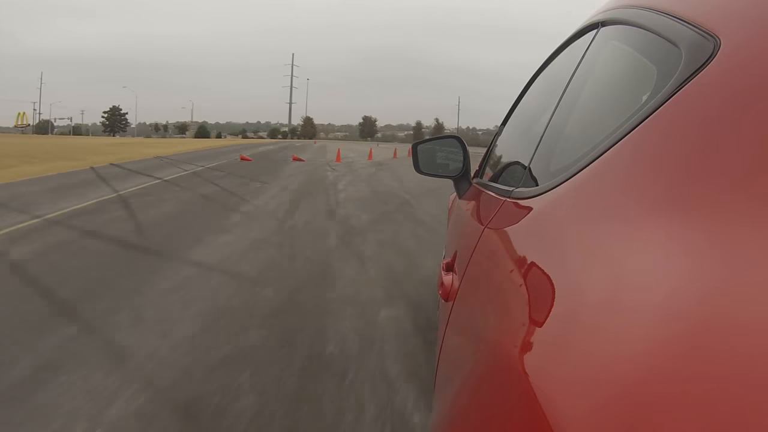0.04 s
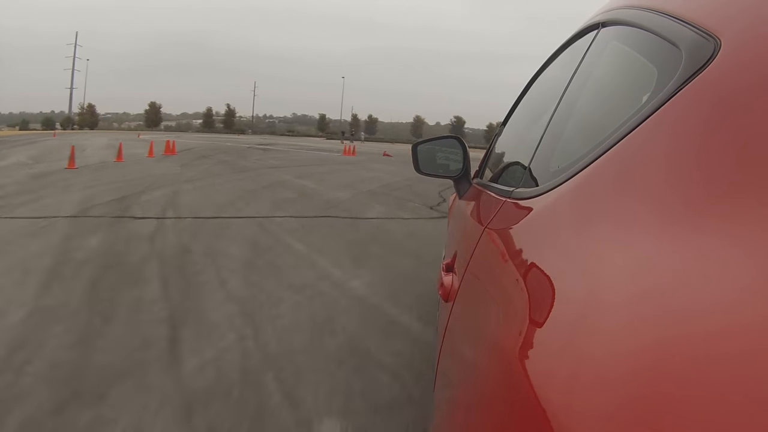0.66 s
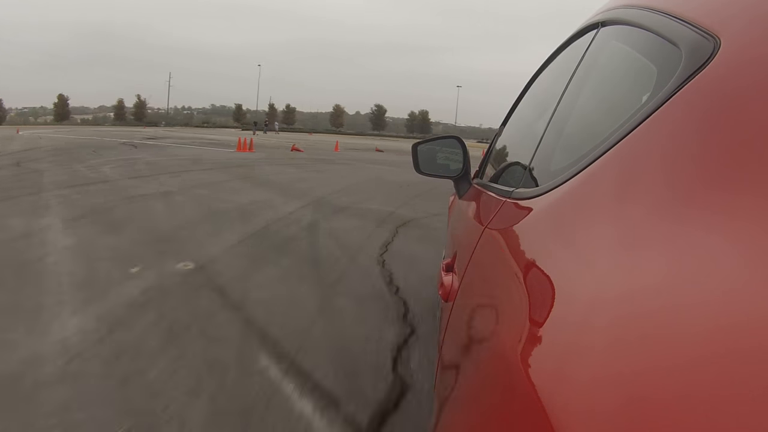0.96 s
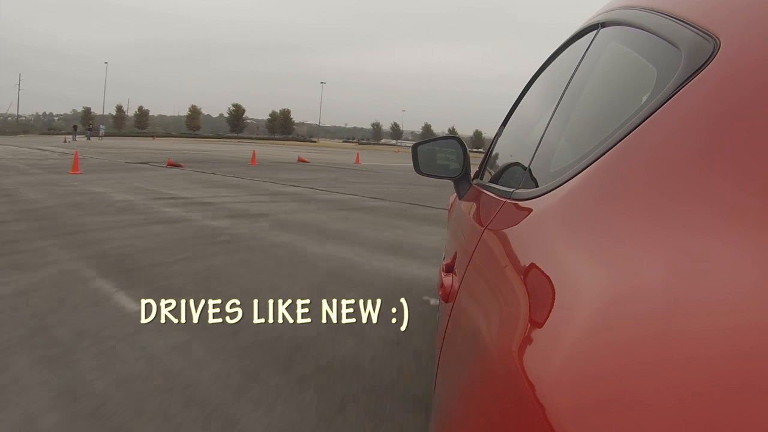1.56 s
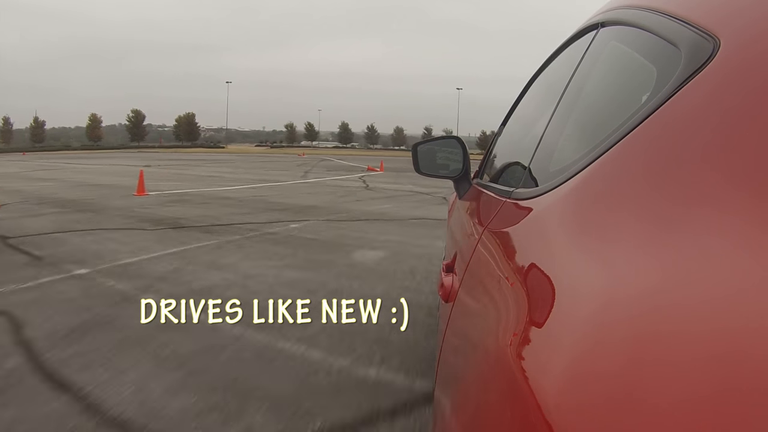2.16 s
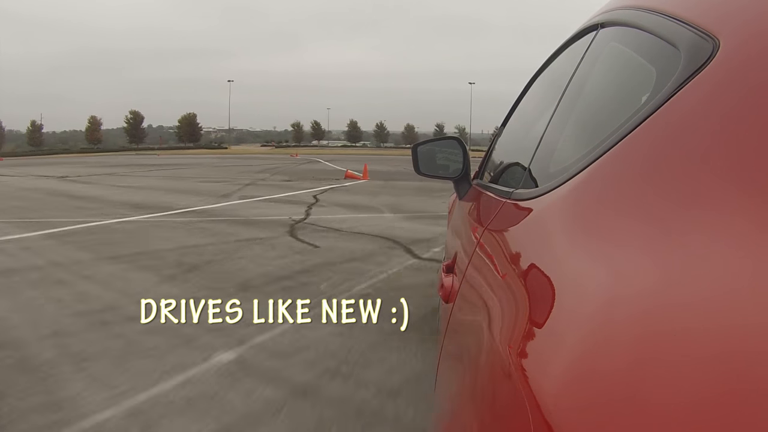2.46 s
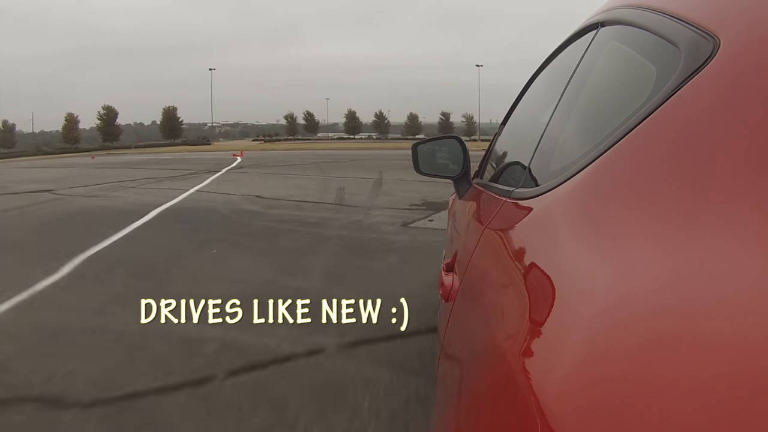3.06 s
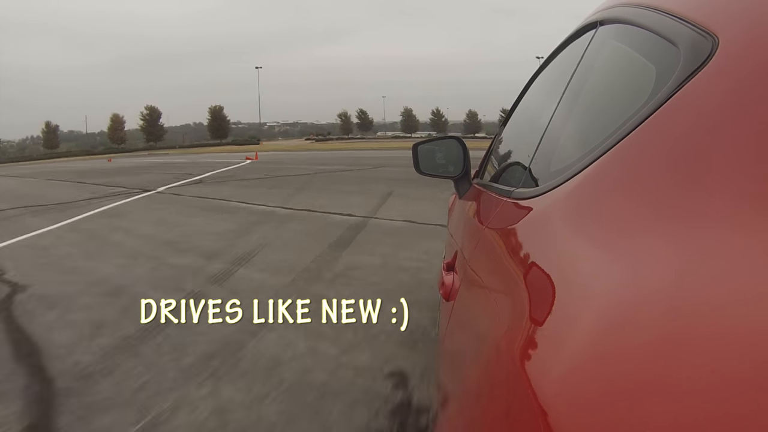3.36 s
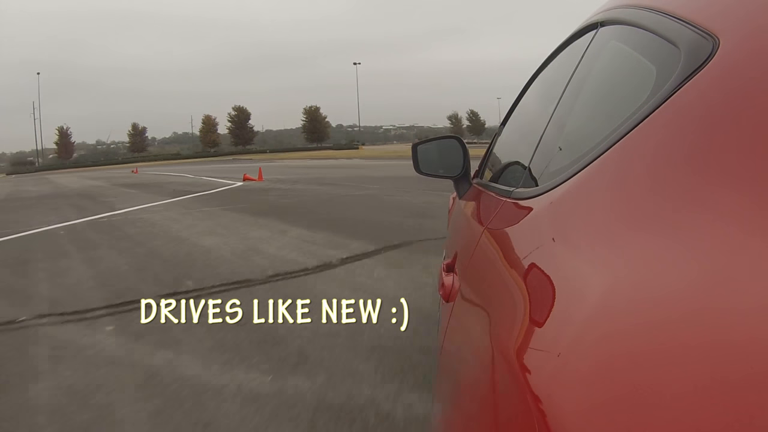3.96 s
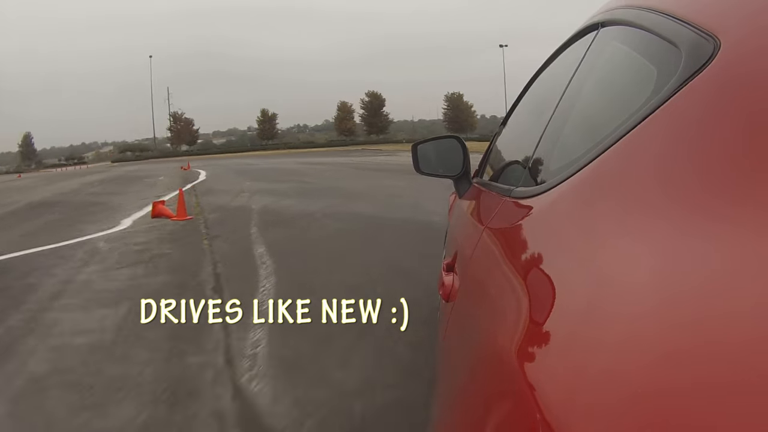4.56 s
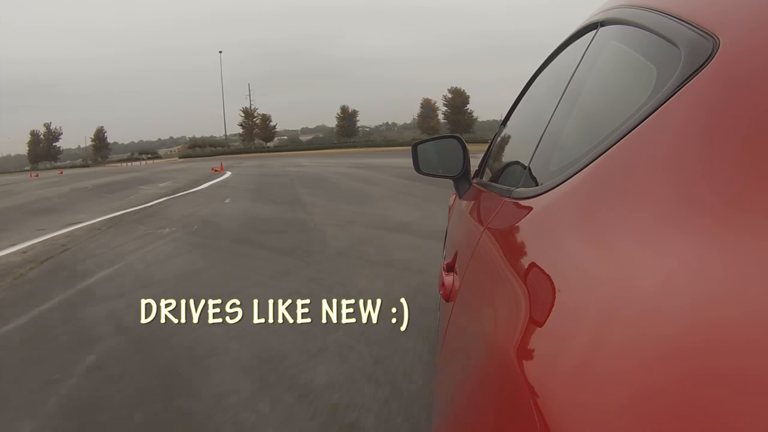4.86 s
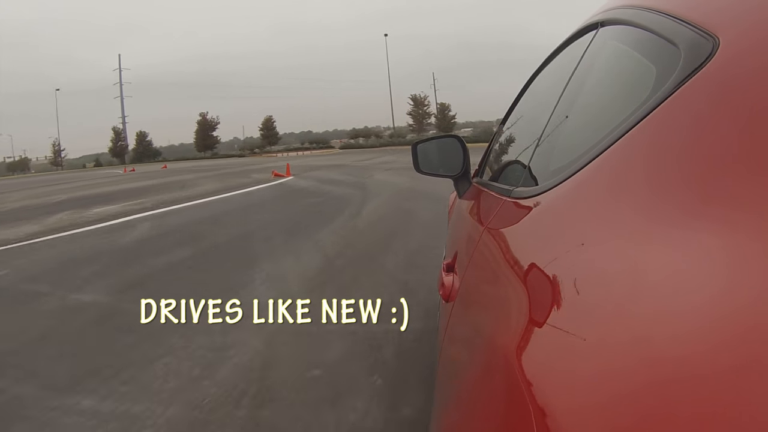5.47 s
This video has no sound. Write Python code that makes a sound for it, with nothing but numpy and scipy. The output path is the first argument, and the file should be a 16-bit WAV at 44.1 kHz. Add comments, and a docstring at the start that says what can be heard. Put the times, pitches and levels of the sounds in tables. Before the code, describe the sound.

Gusting wind and road noise surround a hard-driven car whose tyres squeal through two corners, knocking over seams in between.

```python
"""A car is driven hard round cones on a car park, heard from a microphone on its side.
From the start, gusts of wind thump the microphone over the roar and hiss of the road and a low drone.
For two seconds the tyres chirp and squeal through a corner: rough as they scrub, purer as they bite.
Then the squeal stops, and the tyres knock over seams in the asphalt and scuff briefly.
From about 4.4 s they squeal through a last corner, settling into a clear note near 5.2 s."""
import sys
import numpy as np
from scipy import signal
from scipy.fft import rfft, irfft, next_fast_len
from scipy.io import wavfile
from scipy.ndimage import uniform_filter1d, minimum_filter1d

SR = 44100
rng = np.random.default_rng(int(sys.argv[2]) if len(sys.argv) > 2 else 0)


def master(y):
    """Save y as 16-bit WAV."""
    cut = np.clip(np.atleast_2d(y).T, -1, 1)
    pcm = np.round(cut * 32767)  # scale
    wavfile.write(sys.argv[1], SR, pcm.astype(np.int16))


N = 247842
TIME = np.arange(N) / SR


def gain_of(db):
    """Turns decibels into a number to multiply a sound by."""
    return 10 ** (np.asarray(db) / 20)


def evened(x):
    """Scales a signal so that its average power is one."""
    return x / np.sqrt(np.mean(abs(x) ** 2) + 1e-20)


def curves(rows):
    """Joins the dots of a table: one curve for each column after the time."""
    s, *columns = np.transpose(rows)
    return [np.interp(TIME, s, column) for column in columns]


def hump(s, length):
    """A rounded rise to one and back, centred on time s."""
    return np.exp(-np.minimum(abs(2 * (TIME - s) / length), 4) ** 3)


def noise(shape):
    """Noise in which shape(f) says how strong each frequency is."""
    size = next_fast_len(N)
    spectrum = rfft(rng.standard_normal(size)) * shape(np.fft.rfftfreq(size, 1 / SR))
    return evened(irfft(spectrum, size)[:N])


def coloured(points):
    """Noise whose tone colour follows a table of frequencies and levels."""
    hz, db = np.transpose(points)
    return noise(lambda f: gain_of(np.interp(np.log(f + 1), np.log(hz), db)))


def band(hz):
    """Noise a little over an octave wide around hz."""
    return noise(lambda f: (f / hz) ** 3 / (1 + (f / hz) ** 9))


def wander(rate):
    """A smooth random wobble, up to about rate times a second."""
    return noise(lambda f: 1 / (1 + (f / rate) ** 4))


def steadied(x, span, amount):
    """Partly flattens the chance swells in a noise that last longer than span seconds."""
    window = signal.windows.hann(int(span * SR) + 3)
    power = signal.fftconvolve(abs(x) ** 2, window / window.sum(), "same")
    return evened(x / (power + 1e-3) ** (amount / 2))


def fuzz(width):
    """Random swings of strength and timing that blur a tone by about width Hz each way."""
    return steadied(wander(width) + 1j * wander(width), span=0.073, amount=0.34)


def tone(cycles, rough, width):
    """One tone from a running count of cycles: pure at rough=0, a band of noise at rough=1."""
    rough = np.clip(rough, 0, 1)
    strength = np.sqrt(1 - rough) + np.sqrt(rough) * fuzz(width)
    return np.sqrt(2) * (strength * np.exp(2j * np.pi * cycles)).real


# how the car's drone swells and fades: t/s, level/dB
DRONE_LEVELS = [(0, -31), (.85, -16), (1.1, -18.5), (1.3, -29), (2.2, -22.5), (2.5, -27), (3.2, -13.5),
                (3.7, -68), (5.62, -27)]
def drone():
    """The car under load hums a low, wavering note."""
    db, = curves(DRONE_LEVELS)
    hz = 61 * (1 + 0.0583 * wander(2.8))
    return gain_of(db - 4) * tone(np.cumsum(hz) / SR, rough=0.96, width=5.9)


# swells of rumble: t/s, length/s, level/dB, f/Hz
RUMBLES = [(0.199, 0.019, -14.5, 430), (0.913, 0.13, -24.5, 530), (1.666, 0.089, -25, 601),
           (1.933, 0.058, -16.5, 244), (2.352, 0.054, -18.5, 300), (4.056, 0.08, -16, 236),
           (4.433, 0.092, -18.5, 248), (4.699, 0.056, -18.5, 389.6), (4.899, 0.71, -23, 213)]
def rumbles():
    """Rough air and rough asphalt bring short swells of low noise."""
    return sum(gain_of(db) * hump(s, length) * steadied(band(hz), span=0.04, amount=0.38)
               for s, length, db, hz in RUMBLES)


def pops(per_second=13, widths_s=(0.00089, 0.0014)):
    """Small swirls of air burst on the microphone, each one a push with its rebound."""
    out = np.zeros(N)
    for width_s in widths_s:
        u = np.arange(-SR // 50, SR // 50) / SR / width_s
        push = (1 - u ** 2) * np.exp(-u ** 2 / 2)
        hits = rng.random(N) < per_second / len(widths_s) / SR
        bursts = hits * rng.choice([-1, 1], N) * rng.uniform(0.78, 1, N)
        out += signal.oaconvolve(bursts, push, "same")
    return out


# slow changes in the air and road noise: t/s, wind/dB, roar/dB, hiss/dB
AIR_LEVELS = [(0, -17, -17, -55), (.7, -23, -18, -54.5), (1.5, -23.5, -17, -53.5), (2.2, -21.5, -18, -55.5),
              (2.6, -22, -18.5, -56), (2.95, -20.5, -16.5, -53), (3.1, -18.5, -19, -56),
              (4.05, -20, -17, -54.5), (4.4, -17, -16.5, -56), (4.8, -18.5, -19.5, -56),
              (5.45, -17, -22.5, -62), (5.62, -20.5, -20.5, -57.5)]
# gusts, timed at the thump: t/s, length of each stage/s, surge/dB, thump/dB, duck/dB
WIND_GUSTS = [(1.11, 0.05, 1, 8, -0.5), (2.11, 0.039, 3, 1, 3), (2.43, 0.062, 0, 5.5, 5.5),
              (3.326, 0.031, 4.5, 5.5, 4), (3.518, 0.037, 2, 1.5, 5.5), (3.82, 0.079, 1.5, 4.5, 1),
              (4.484, 0.037, 3.5, -7, 0), (4.86, 0.04, 3.5, 4, 5)]
def airflow():
    """Three levels: a gust surges and thumps the microphone, then roar and hiss duck briefly."""
    wind_db, roar_db, hiss_db = curves(AIR_LEVELS)
    thumps = sum(thump_db * hump(s, length) for s, length, _, thump_db, _ in WIND_GUSTS)
    swing = sum(surge_db * hump(s - length, length) - duck_db * hump(s + length, length)
                for s, length, surge_db, _, duck_db in WIND_GUSTS)
    return wind_db + thumps, roar_db + swing, hiss_db + 0.93 * swing


# tone colours of the wind on the microphone, the road's roar and its hiss: f/Hz, level/dB
WIND_COLOUR = [(12, -18), (24, -8), (38, 3), (55, 1), (80, -2.5), (120, -7.5), (250, -39.5), (600, -95)]
ROAR_COLOUR = [(40, -18.5), (90, -1), (140, 1.5), (250, -2.5), (400, -5), (600, -10), (800, -16.5),
               (1100, -25.5), (1600, -29), (2600, -39), (3600, -41), (7000, -94)]
HISS_COLOUR = [(500, 8), (1500, 0), (2800, 7.5), (3500, -3), (4500, 3), (5500, -4), (6800, -9),
               (8500, -9.5), (10000, -11.5), (11200, -17.5), (12500, -27.5), (15000, -32.5)]
def wind_and_road():
    """Swirling air thumps the microphone and shakes the roar and the hiss together."""
    wind_db, roar_db, hiss_db = airflow()
    swirls, flicker = wander(29), wander(130)
    wind = gain_of(wind_db + 1) * steadied(coloured(WIND_COLOUR), span=0.13, amount=0.55)
    shaken_roar = coloured(ROAR_COLOUR) * gain_of(0.96 * swirls + 1.46 * flicker)
    roar = gain_of(roar_db - 0.45) * steadied(shaken_roar, span=0.19, amount=0.75)
    hiss = gain_of(hiss_db + 13) * evened(coloured(HISS_COLOUR) * gain_of(1.1 * swirls + flicker))
    return wind + roar + hiss + gain_of(roar_db + 9) * pops()


# hits from grit and seams: t/s, level/dB, fade time/s, f/Hz
KNOCKS = [(0.456, -45, 0.0036, 9500), (2.585, -4.5, 0.0041, 453), (3.301, -9, 0.0048, 402),
          (3.323, -28, 0.0042, 1620), (3.436, -18, 0.0048, 1720), (3.443, -7, 0.0065, 325),
          (3.488, -1.5, 0.0066, 308), (4.03, -16, 0.0078, 560), (4.692, -10, 0.0043, 500)]
def knock(s, db, decay, hz):
    """Flung grit ticks on the car, or a seam knocks a tyre: noise that dies at once."""
    age = np.maximum(TIME - s, 0)
    rise = np.minimum(age * hz / 2, 1)  # two cycles long
    return gain_of(db) * rise * np.exp(-age / decay) * steadied(band(hz), span=0.025, amount=0.68)


# tone colour of dragged rubber: f/Hz, level/dB
SCRUB_COLOUR = [(400, -37), (780, 9), (1200, 7.5), (1550, -1.5), (2200, -3.5), (2900, -9), (3600, -15.5),
                (4500, -15), (7000, -33), (12000, -70)]
def scrub():
    """The even noise of rubber dragging over asphalt."""
    return coloured(SCRUB_COLOUR)


# brief sideways drags: t/s, length/s, level/dB
TYRE_SCUFFS = [(0.197, 0.059, -29), (3.277, 0.076, -31), (3.5, 0.045, -35)]
def scuffs():
    """A tyre is dragged sideways for a moment without finding a note."""
    return scrub() * sum(gain_of(db) * hump(s, length) for s, length, db in TYRE_SCUFFS)


# short slips: t/s, f/Hz, level/dB, length/s, overtone/times the pitch, overtone/dB against the note
TYRE_CHIRPS = [(.585, 1100, -18.5, 0.021, 1.7, -17), (0.714, 1124, -16, 0.028, 2.1, -26),
               (0.811, 1090, -15, 0.039, 1.96, -15), (0.885, 1033, -16.5, 0.018, 1.85, -24),
               (0.962, 1073, -21, 0.041, 1.97, -3), (1.171, 1280, -22, 0.031, 1.9, -15),
               (1.887, 1280, -25.5, 0.07, 1.92, -15), (2.06, 1450, -26, 0.031, 1.7, -18),
               (3.304, 1016, -26.5, 0.014, 2.43, -10), (5.042, 1495, -28, 0.049, 1.57, -7),
               (5.045, 1265, -25, 0.034, 1.57, -15), (5.407, 1330, -26.5, 0.05, 1.7, -14)]
def chirps():
    """A bump takes weight off a tyre, and its tread yelps and scrapes for a moment."""
    note_blur, overtone_blur = steadied(fuzz(95), span=0.03, amount=0.83), fuzz(230)
    scrape = gain_of(-11.5) * scrub()
    out = np.zeros(N)
    for s, hz, db, length, ratio, overtone_db in TYRE_CHIRPS:
        near = abs(TIME - s) < 2 * length
        t = TIME[near] - s
        note = note_blur[near] * np.exp(2j * np.pi * hz * t)
        overtone = gain_of(overtone_db) * overtone_blur[near] * np.exp(2j * np.pi * hz * ratio * t)
        yelp = np.sqrt(2) * (note + overtone).real
        out[near] += gain_of(db) * np.exp(-(2 * t / length) ** 2) * (yelp + scrape[near])
    return out


def stick_slip(hz, jitter, rate):
    """Counts the cycles of rubber gripping and letting go, their pace shaken by grainy asphalt."""
    return np.cumsum(hz * (1 + jitter * wander(rate))) / SR


# short tyre cries: t/s, length/s, f/Hz, glide/Hz per s, level/dB, octave/dB, smear/0-1
TYRE_CRIES = [(0.07, 0.16, 830, -200, -28.5, -41, 0.2), (0.199, 0.12, 898, 600, -30, -40.5, 0.5),
              (.2, 0.13, 1138, 298, -35, -52, 0.3), (0.319, 0.079, 952, 203, -28.5, -33.5, 0.2),
              (0.451, 0.15, 902, -600, -23, -30.5, 0.2), (0.731, 0.41, 1041, 2, -37, -32.5, 0.25),
              (0.929, 0.071, 892, -300, -20, -28, 0.2), (1.108, 0.24, 933, 95, -31.5, -36, 0),
              (1.185, 0.11, 1137, 0, -24, -40, 0.7), (1.25, 0.079, 1065, 600, -22.5, -30.5, 0.08),
              (1.374, 0.059, 1171, -1100, -15, -32.5, 0.02), (1.59, 0.089, 1205, -350, -30, -42, 0),
              (1.665, 0.24, 764, 6, -26.5, -43, 0.5), (1.695, 0.15, 1038, 0, -37, -41, 0),
              (1.905, 0.08, 1194, -600, -37, -40, 0), (2.005, 0.047, 1215, 300, -30, -42, 0.1),
              (2.118, 0.11, 1406, -400, -34, -54, 0.94), (4.358, .13, 953, 1201, -33.5, -45, 0.6),
              (4.6, 0.18, 931, 0, -38, -39.5, 0.6), (4.732, .15, 1128, 0, -33, -41, 0.8),
              (4.824, 0.05, 967, 513, -47, -33.5, 0.07), (4.995, 0.06, 1111, 704, -23.5, -37.5, 0),
              (5.01, .2, 966, 2, -40, -36, 0), (5.163, 0.14, 1098, 698, -28, -34, 0),
              (5.24, 0.06, 1160, -500, -38, -30, 0.07), (5.6, 0.29, 906, 98, -30, -33, 0.16)]
def cries(rough=0.45):
    """Short tyre cries with their octaves, wavering or smeared, on and around the main squeal."""
    clear = np.sqrt(1 - rough) + np.sqrt(rough) * fuzz(37)
    smeared = steadied(fuzz(150), span=0.036, amount=0.91)
    gritty = steadied(fuzz(300), span=0.032, amount=0.79)
    rasp = fuzz(220)
    chatter = evened(gain_of(3 * wander(30)))  # the overtones come and go raggedly
    drift_s = stick_slip(0.98, jitter=0.01423, rate=60) - TIME  # wavers about 2% under the listed pitch
    out = np.zeros(N)
    for s, length, hz, glide, db, octave_db, smear in TYRE_CRIES:
        near = abs(TIME - s) < length
        t = TIME[near] - s
        wave = np.exp(2j * np.pi * (hz * (t + drift_s[near]) + glide * t ** 2 / 2))
        howl = np.sqrt(1 - smear) * clear[near] + np.sqrt(smear) * smeared[near]
        # the octave smears twice as readily
        octave = (1 - smear) * clear[near] + np.sqrt(1 - (1 - smear) ** 2) * gritty[near]
        third_db = octave_db - 8 - 35.5 * abs(np.log2(hz / 900))  # strongest for cries near 900 Hz
        overtones = gain_of(octave_db) * octave * wave ** 2 + gain_of(third_db) * rasp[near] * wave ** 3
        cry = gain_of(db) * howl * wave + chatter[near] * overtones
        out[near] += np.sqrt(2) * hump(s, length)[near] * cry.real
    return out * evened(gain_of(1.55 * wander(33)))


# the sliding tread bites into a louder, purer note: t/s, length/s, rise/dB
TREAD_BITES = [(0.312, 0.091, 8), (0.437, 0.077, 6), (0.764, 0.052, 6), (1.27, 0.036, 12),
               (1.308, 0.027, 10), (1.338, 0.02, 9), (1.502, 0.075, 7), (1.686, 0.036, 6.5),
               (1.757, 0.026, 6), (1.886, 0.056, 7), (4.741, 0.043, 2.5), (4.963, 0.054, 3),
               (5.052, 0.052, 8.5), (5.117, 0.06, 6.5), (5.324, 0.039, 3.5), (5.492, 0.084, 3.5),
               (5.58, 0.12, 3.5)]
# the tread grips again and the howl dips: t/s, length/s
TREAD_GRIPS = [(0.395, 0.044), (0.555, 0.026), (0.63, 0.088), (0.79, 0.018), (.855, 0.041), (0.99, 0.024),
               (1.428, 0.014), (1.827, 0.044), (1.965, 0.022)]
def slide(slide_db):
    """Howl level, octave level and roughness: harder sliding is brighter, a bite louder and purer."""
    bite_db = sum(rise_db * hump(s, length) for s, length, rise_db in TREAD_BITES)
    grip_db = -2 * sum(hump(s, length) for s, length in TREAD_GRIPS)
    sing_db = 12 * hump(5.21, length=0.36)  # deep in the last corner the tyre settles and sings
    rough = 0.634 * gain_of(-2.11 * bite_db - sing_db)
    octave_db = -35.5 + 2.3 * (slide_db + 26.5)  # a full slide is -26.5 dB
    return slide_db + bite_db + grip_db, octave_db, rough


# the loaded tyre's squeal, one table a corner: t/s, f/Hz, level of sliding/dB
FIRST_CORNER = [(.275, 1108, -27.5), (.5, 1100, -28.5), (.65, 1055, -30), (.74, 1095, -26.5),
                (.86, 1053, -26.5), (1.0, 1035, -26), (1.28, 1150, -27.5), (1.41, 1145, -26.5),
                (1.505, 1325, -28), (1.7, 1085, -31), (1.83, 1150, -33.5), (1.95, 1160, -35),
                (2.03, 1250, -37)]
LAST_CORNER = [(4.6, 900, -29.5), (4.7, 1045, -28), (4.88, 950, -34), (4.925, 945, -25),
               (5.03, 1065, -30.5), (5.11, 977, -26.5), (5.21, 925, -26.5), (5.27, 960, -27),
               (5.34, 1024, -30), (5.47, 973, -27.7), (5.61, 1091, -28)]
def loaded_tyre(corner, fade_s=0.031):
    """The tyre carrying most weight howls; the rougher it slides, the more it smears and stutters."""
    hz, slide_db = curves(corner)
    howl_db, octave_db, rough = slide(slide_db)
    wavering_hz = hz * (1 + 0.00896 * wander(21.4))
    cycles = stick_slip(wavering_hz, jitter=0.0284 * np.clip(rough + 0.17, 0, 1), rate=77)
    howl = gain_of(howl_db + 2) * tone(cycles, rough + 0.028, width=98)
    octave = gain_of(octave_db) * tone(2 * cycles, rough + 0.2, width=180)
    third = gain_of(octave_db - 20.5) * tone(3 * cycles, rough=0.88, width=290)
    # a second rib of the tread sounds 5% higher and beats against the howl
    rib_cycles = stick_slip(hz * 1.05, jitter=0.03, rate=18)
    rib = gain_of(slide_db - 5.5) * tone(rib_cycles, rough=0.27, width=25)
    rib_octave = gain_of(octave_db - 7) * tone(2 * rib_cycles, rough=0.8, width=60)
    flutter = gain_of(2.8 * np.sqrt(rough) * wander(50))
    drag = gain_of(0.5 * octave_db - 11.25) * scrub()  # rubber scrubs more evenly than it howls
    inside_s = np.minimum(TIME - corner[0][0], corner[-1][0] - TIME)  # negative outside the corner
    fade = np.clip(1 + inside_s / fade_s, 0, 1)
    return fade * (flutter * (howl + octave + third + rib + rib_octave) + drag)


def scene():
    """Tyres, wind and car at one microphone."""
    tyres = loaded_tyre(FIRST_CORNER) + loaded_tyre(LAST_CORNER) + cries() + chirps() + scuffs()
    knocks = sum(knock(*row) for row in KNOCKS)
    return (tyres + knocks + wind_and_road() + rumbles() + drone())[None]


def record(dry):
    """A limiter turns down the highest peaks; then the very top of the treble is cut."""
    needed_gain = np.minimum(1, 0.8 / (abs(dry[0]) + 1e-9))
    gain = uniform_filter1d(minimum_filter1d(needed_gain, size=1100), size=900)
    soft_ends = signal.windows.tukey(N, 0.001)
    treble_cut = signal.firwin(511, cutoff=15100, window=("kaiser", 9), fs=SR)
    return signal.oaconvolve(dry * gain * soft_ends, treble_cut[None], "same")


dry = scene()
out = record(dry)
master(out)
```